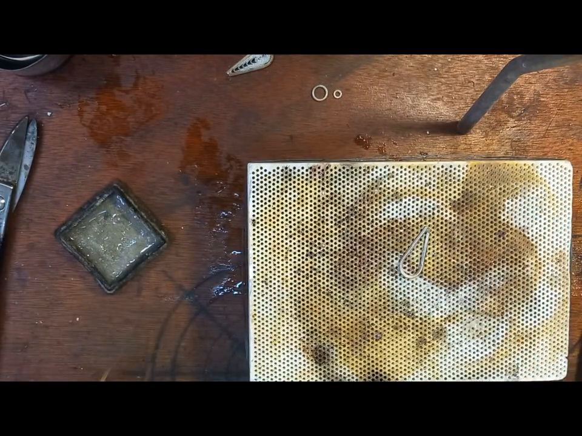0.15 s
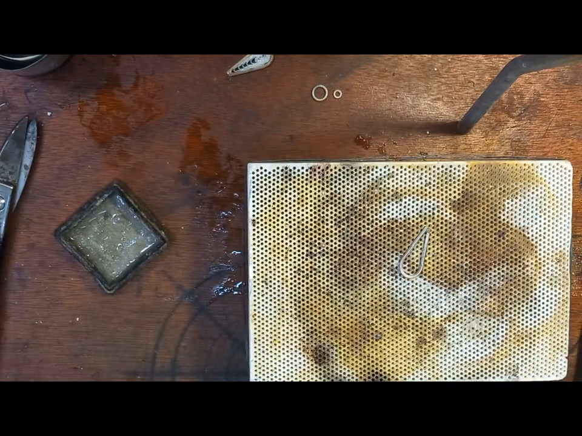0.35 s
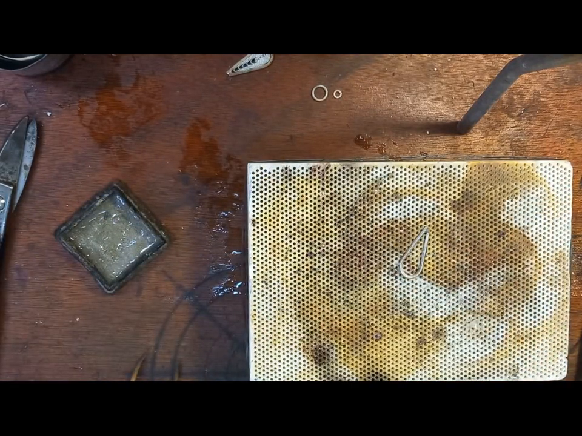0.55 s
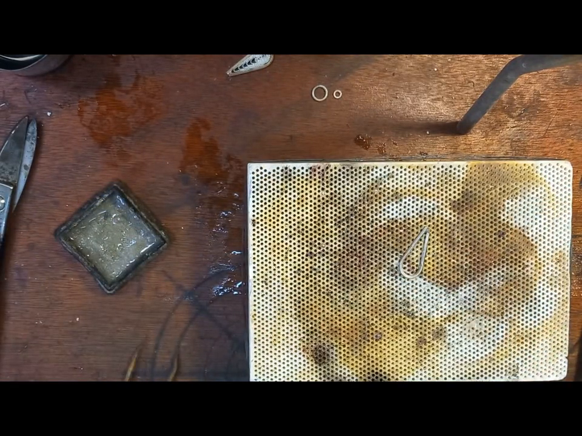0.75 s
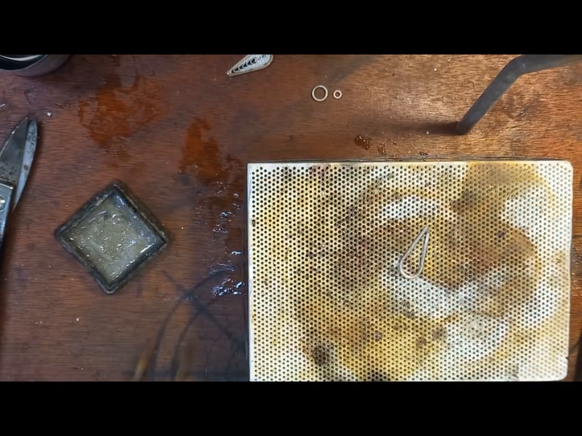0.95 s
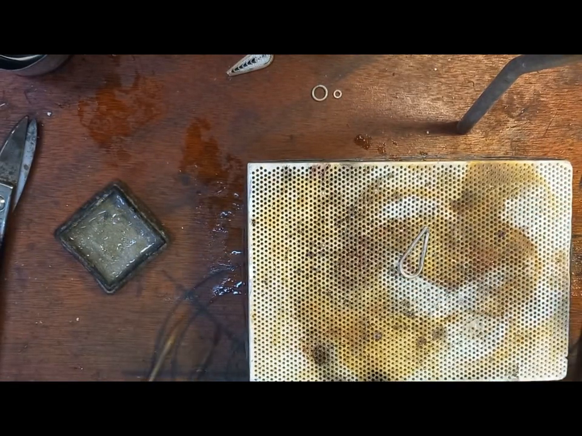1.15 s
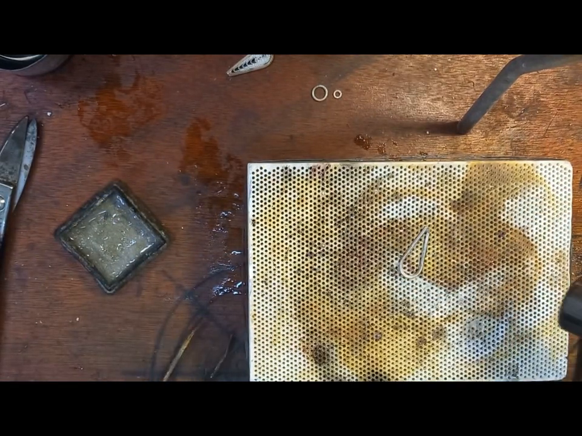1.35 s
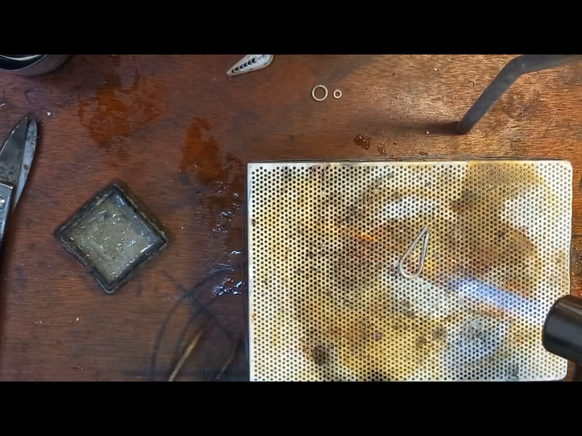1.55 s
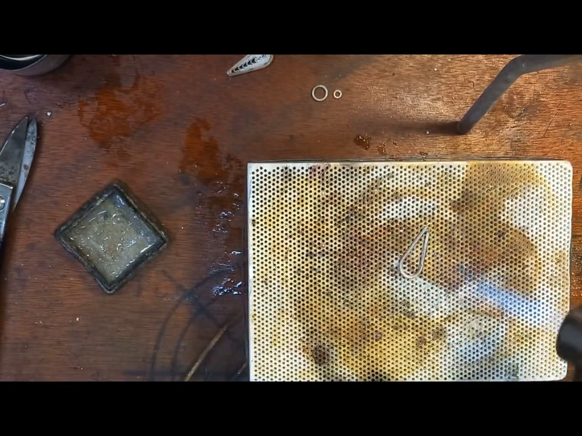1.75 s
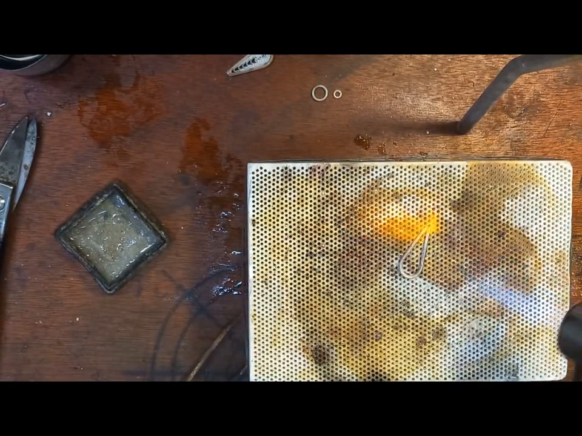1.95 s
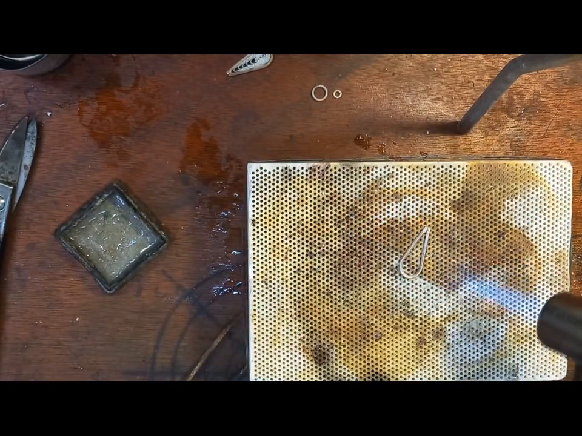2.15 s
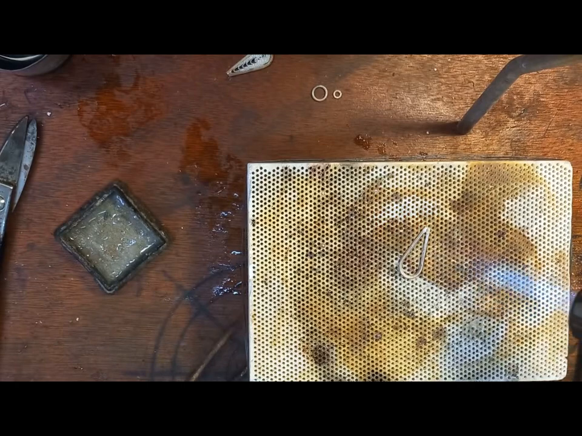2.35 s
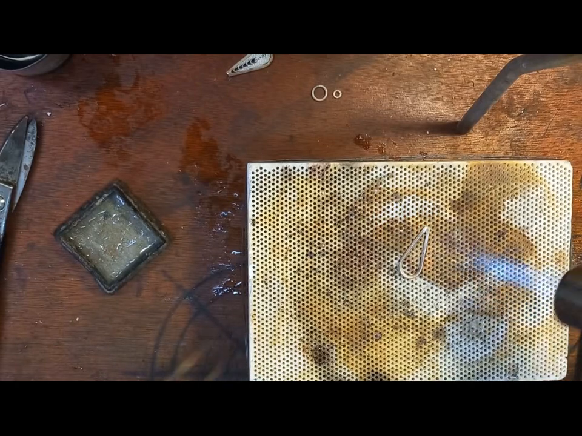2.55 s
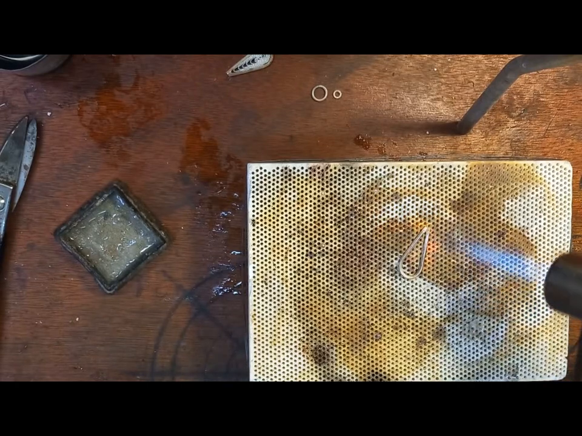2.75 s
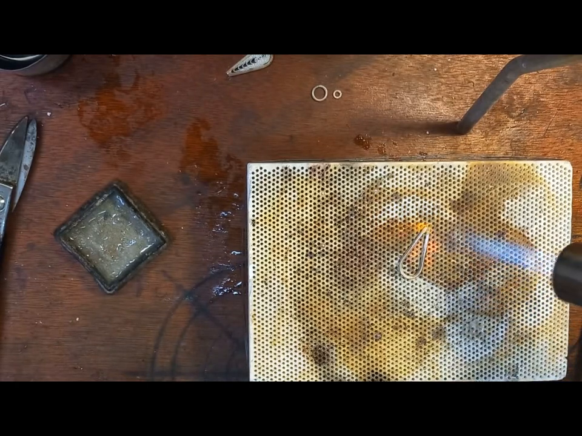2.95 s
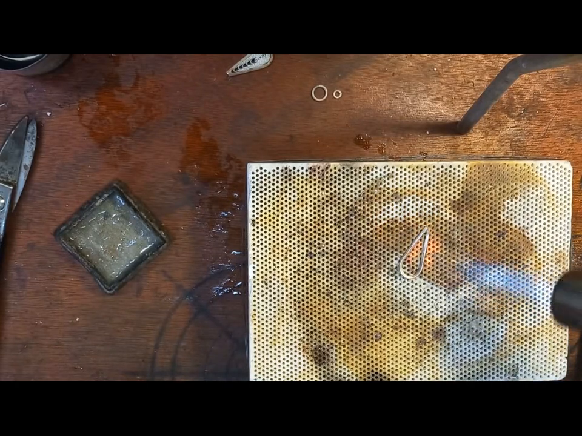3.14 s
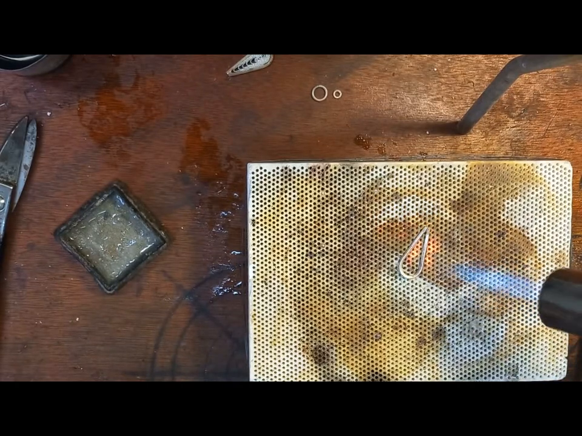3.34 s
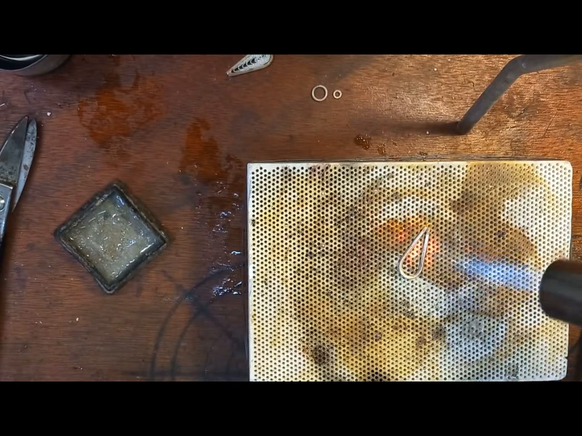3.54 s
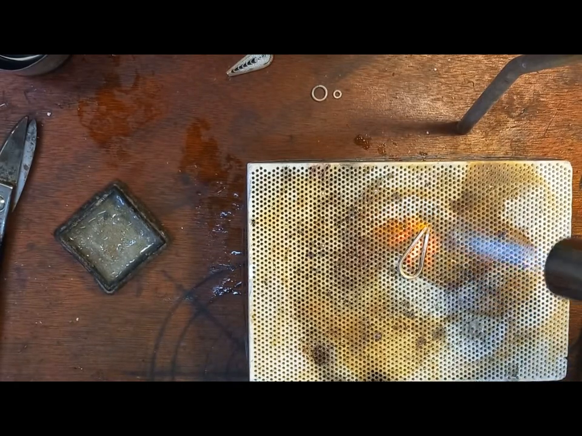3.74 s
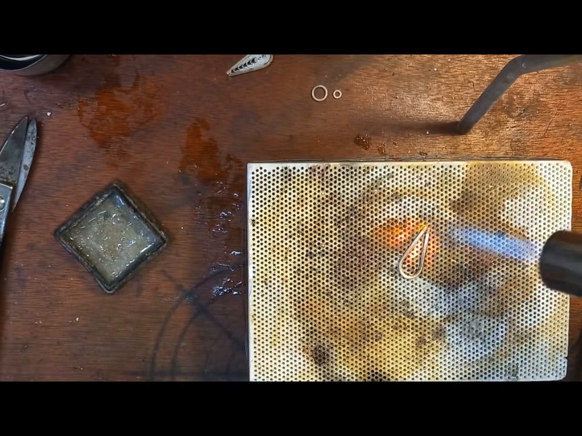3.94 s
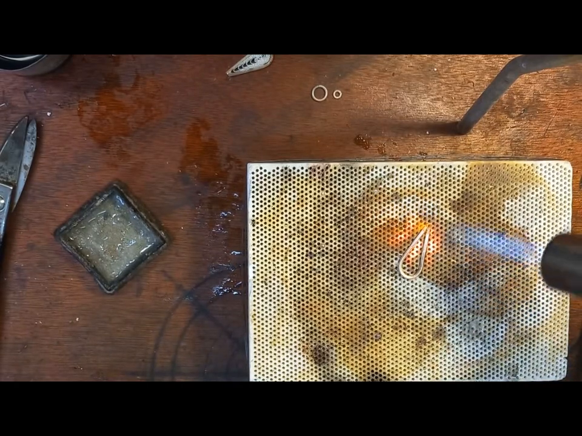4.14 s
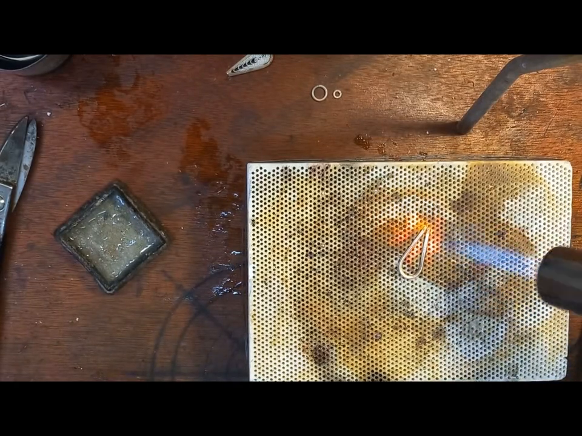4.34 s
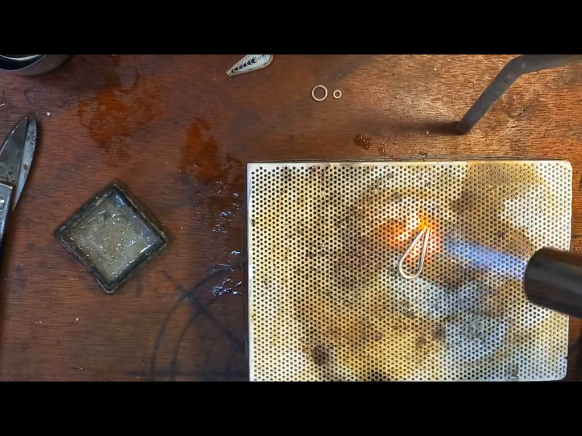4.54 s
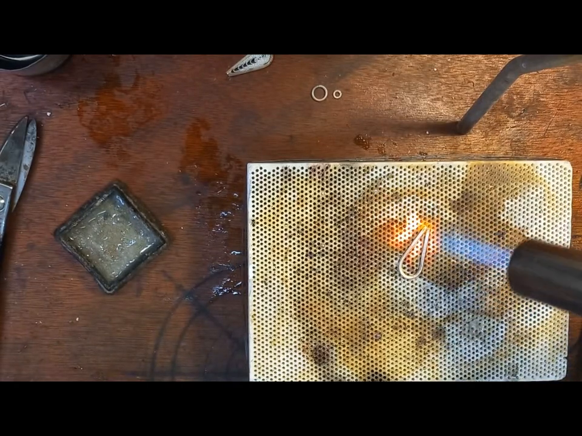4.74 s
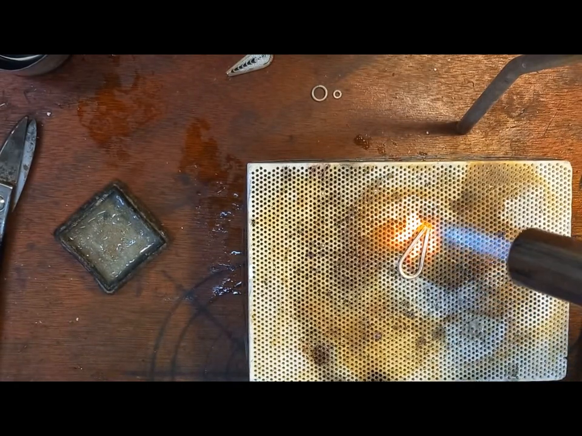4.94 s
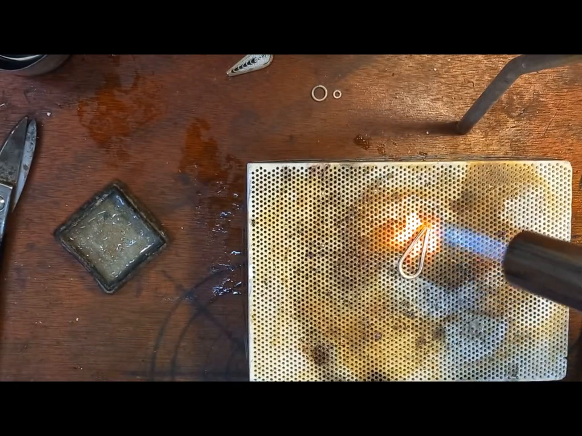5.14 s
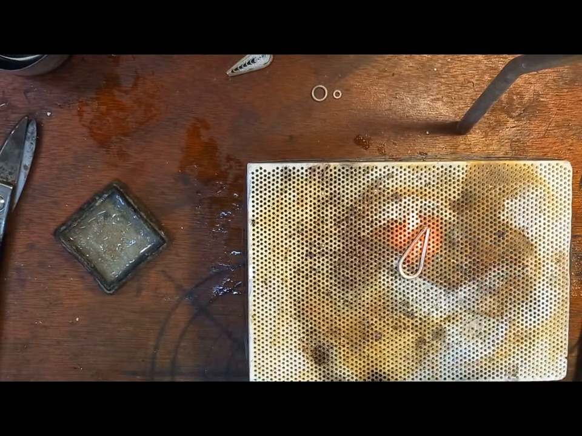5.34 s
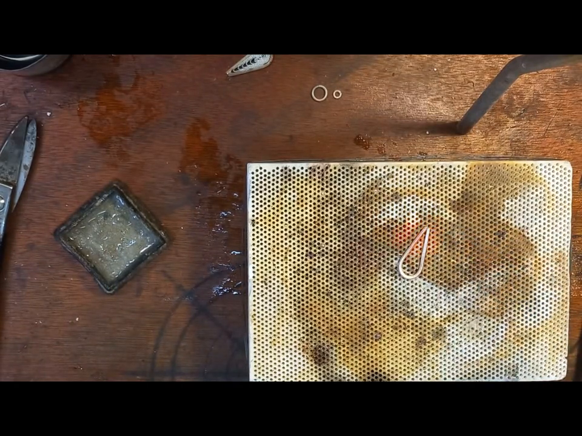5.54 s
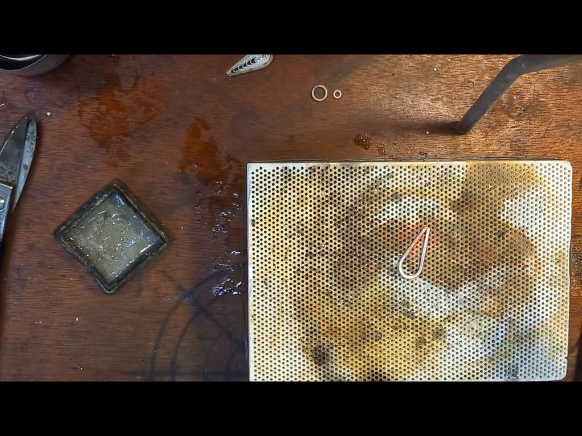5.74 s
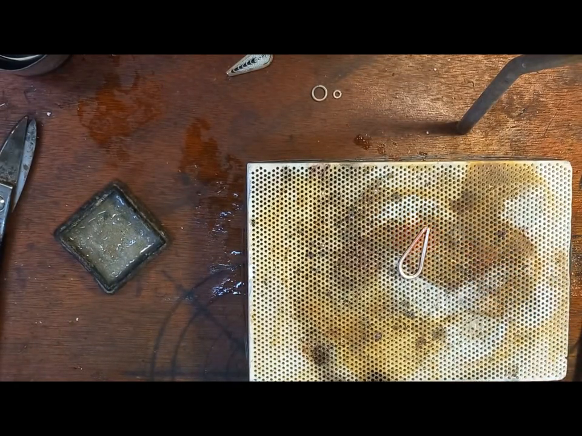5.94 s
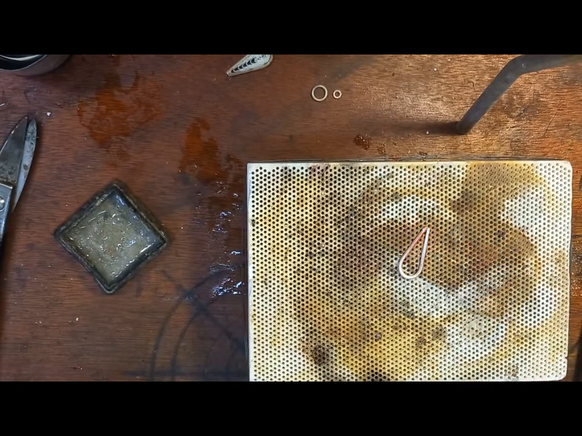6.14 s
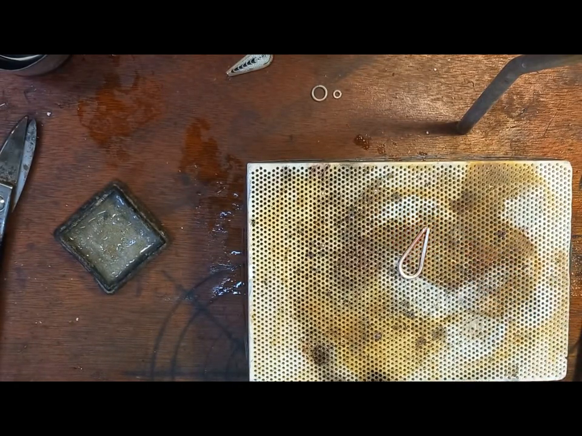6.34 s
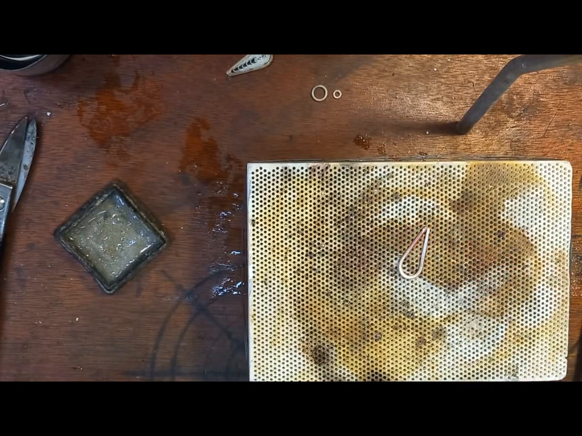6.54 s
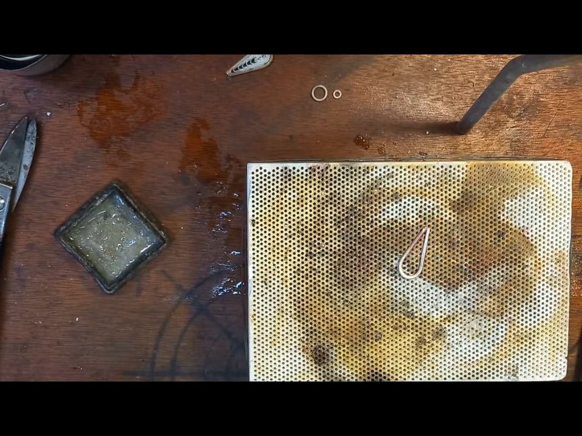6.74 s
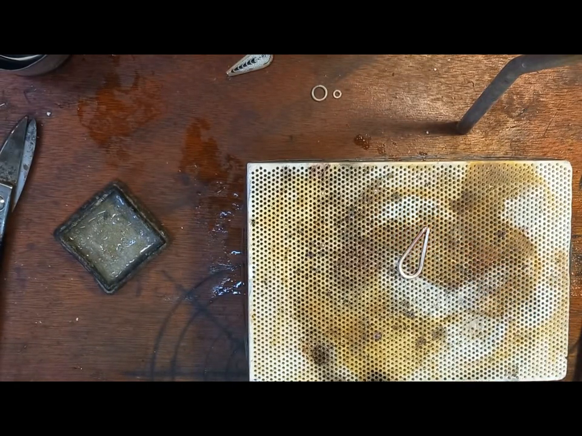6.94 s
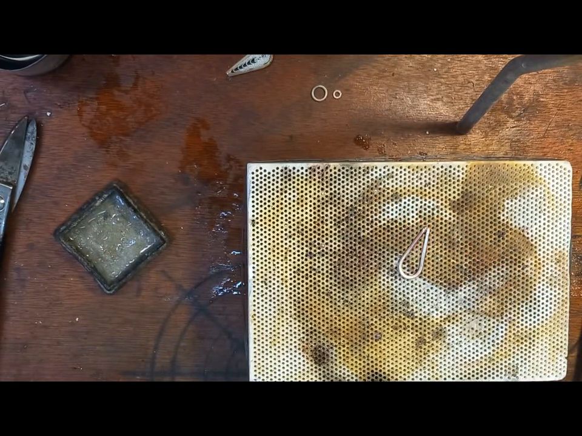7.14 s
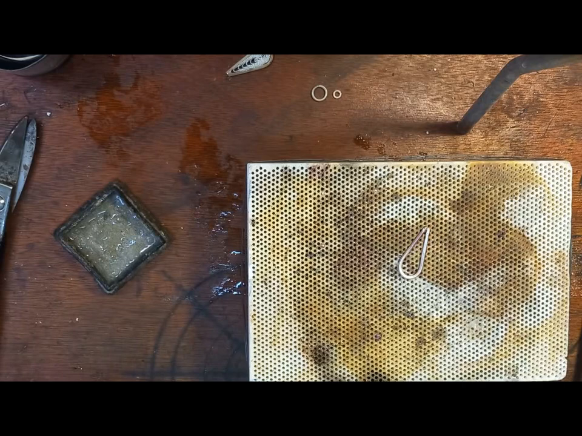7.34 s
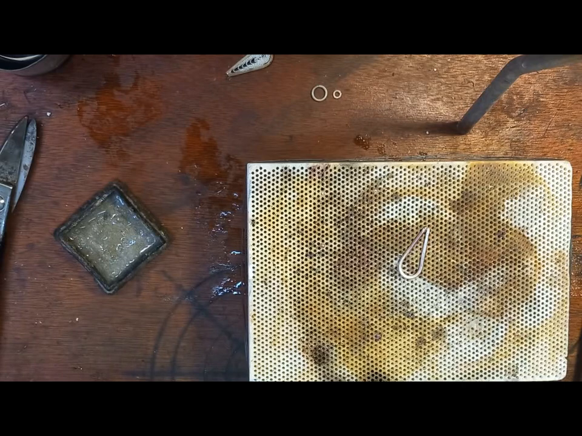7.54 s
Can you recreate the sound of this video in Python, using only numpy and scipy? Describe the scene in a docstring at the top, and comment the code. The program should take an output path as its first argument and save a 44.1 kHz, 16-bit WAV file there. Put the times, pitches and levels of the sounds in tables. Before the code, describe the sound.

In a small workshop with a low fan drone, a torch is picked up from a wooden bench with faint taps, slides and two hard knocks. Thin gas hisses briefly, an igniter snaps sharply, and the flame roars steadily, slightly stronger once aimed at metal. The valve clicks, the roar dies quickly, and only the hum and faint ticks remain. Close stereo microphone, short dry room.

```python
"""A gas torch at a wooden workbench, while a ventilation fan drones in the small workshop throughout.
First come a few taps, slides and two knocks (bench ringing under contact noise) as it is picked up.
Unlit gas then hisses (coloured noise), a spark snaps, and the flame roars (noise in resonances),
growing once it is aimed at a small metal piece. The valve shuts and the roar dies away.
Last come two very faint squeaks of cooling flux (gliding tones) and faint ticks and slides of handling."""
import sys
import numpy as np
from scipy import signal
from scipy.fft import rfft, irfft, next_fast_len
from scipy.io import wavfile
from scipy.ndimage import map_coordinates

SR = 44100
rng = np.random.default_rng(int(sys.argv[2]) if len(sys.argv) > 2 else 0)


def transcribe(u):
    """Save the signal u as a 16-bit wav file named by the first command-line argument.

    u: samples, shape (n,) or (channels, n), limited to [-1, 1]; the rate is SR.
    q: integer samples, one column per channel.
    """
    v = np.clip(np.atleast_2d(u).T, -1, 1)
    q = np.round(v * 32767).astype(np.int16)
    wavfile.write(sys.argv[1], SR, q)


N = 339035
TIME = np.arange(N) / SR  # s

GAS_ON, SPARK, GAS_OFF = 1.402, 1.5268, 5.228  # s
TOP_HZ = 15760  # nothing sounds from here up

# how alike left and right are in the flame and in low rubbing: f/Hz, likeness (1 = the same)
FLAME_ALIKE = [(200, 0.88), (700, .95), (1300, 0.63), (2200, 0.8), (3000, .95), (4500, 0)]
# how alike left and right are in the gas jet: f/Hz, likeness (1 = the same)
JET_ALIKE = [(2000, .8), (5000, 0.28), (8000, 0.51), (13000, 0.38)]
# how far the jet's left channel runs ahead of the right: f/Hz, phase/rad (negative = behind)
JET_PHASE = [(2000, -7), (2800, -2.5), (3400, -.5), (4100, -1.5), (4700, -1.5), (5300, -1.5), (6300, -3),
             (7100, -0.2), (8000, -2.5), (9400, -2), (10500, -2), (15500, -8)]
# left-right balance of the room and of handling: f/Hz, left minus right/dB
ROOM_SIDE = [(60, -2), (130, -2), (290, 2), (640, 0.5), (1410, 2.5), (3100, 1), (6820, -4), (15000, 5)]


def flame():
    """Turbulent burning roars in bench and room resonances, under the nozzle's hiss; aiming raises both."""
    # bench and room resonances that the roar excites: f/Hz, width/Hz (before resonant() narrows it), level/dB
    roar_modes = [(211, 25, 6.5), (301, 90, -10.5), (329, 25, 3.5), (390, 22.4, 5.5), (442, 22, 1.5),
                  (503, 30, 1.5), (572, 22, 4.5), (633, 31.5, 3), (716, 35, -12.5), (867, 21, -4),
                  (942, 16, -3), (1004, 34, -8), (1156, 44, -11.5), (1333, 22, -10), (1443, 46, -13),
                  (1570, 31, -9), (1815, 50, -10.5), (1940, 100, -12.5), (2287, 144, -14.5)]
    # smooth spectrum of the roar: f/Hz, relative level per Hz/dB
    roar_spectrum = [(120, -24), (170, -11), (250, -3), (420, -1.5), (640, -7.5), (760, -9.5), (1050, -3.5),
                     (1350, -13), (1900, -6.5), (2350, -10), (2700, -20.5), (5000, -44)]
    # spectrum of the nozzle's hiss: f/Hz, relative level per Hz/dB
    jet_spectrum = [(1500, -20), (2700, -1), (3050, 0.5), (3380, 3), (3750, 1), (4550, 0.5), (5100, -3),
                    (6400, -1.5), (7500, 0.5), (8450, 3.5), (8900, -11.5), (11500, -8.5), (12700, -2.5),
                    (13800, -8), (15800, -11.5)]
    # left-right balance of the flame: f/Hz, left minus right/dB
    flame_side = [(200, -3), (320, 1.5), (400, -5), (560, 2.5), (760, -9.5), (1000, 0), (1300, 0.5),
                  (1900, 2.5), (2400, 2), (3400, -0.5), (6500, -5.5), (8300, 5), (11000, 0.5), (15000, -1)]
    roar_db, jet_db = -25.4, -36.9  # the flame beside the piece, before the room answers
    aim_s, aim_takes_s = 2.65, .4  # the hand turns the flame onto the piece: when, and for how long
    aim_roar_db, aim_jet_db = 1.8, 1.1  # growth once the flame plays on the piece
    flutter_rate, flutter_roar_db, flutter_jet_db = 14, .45, .33  # eddies: knots per second, depths
    sway_rate, sway_db = 4, .35  # the roar swells as the hand wanders: knots per second, depth

    resonances = rush(resonant(roar_modes), FLAME_ALIKE, flame_side)
    smooth_roar = rush(colour(roar_spectrum), FLAME_ALIKE, flame_side)
    roar = unit(resonances + amp(-4.5) * smooth_roar)

    jet = lead(rush(colour(jet_spectrum), JET_ALIKE, flame_side), JET_PHASE)
    jet = bench_echo(jet, delay_ms=1.78, sway_ms=0.065, echo_db=-9)
    jet = bench_echo(jet, delay_ms=3.25, sway_ms=.08, echo_db=-17.5)
    jet = bench_echo(jet, delay_ms=5.3, sway_ms=0.072, echo_db=-15.5)

    aim = np.clip((TIME - aim_s) / aim_takes_s, 0, 1)
    flutter = wobble(flutter_rate)
    roar_level = roar_db + aim_roar_db * aim + flutter_roar_db * flutter
    roar_level += sway_db * wobble(sway_rate) + 0.62 * wobble(70)  # slow sway and fast flicker
    jet_level = jet_db + aim_jet_db * aim + flutter_jet_db * flutter
    roar = roar * amp(roar_level) * valve(SPARK, rise=0.011, fall_t60=0.15)
    jet = jet * amp(jet_level) * valve(SPARK, rise=.002, fall_t60=.18)
    return workshop(roar + jet, wet_db=-10.5, low_hz=1530)


def cold_gas():
    """Unlit gas whistles thinly through the burner tube, and dies away from the spark on."""
    # spectrum of the unlit gas: f/Hz, relative level per Hz/dB
    gas_spectrum = [(1500, -38), (2700, -14), (3550, -2.5), (4300, -12), (5400, -6), (6400, -.5), (7400, 3),
                    (8400, 1.5), (9200, -3.5), (10200, -15), (13000, -7), (15800, -20)]
    gas_side = [(3500, 5), (5000, -2), (7000, -9), (8400, 10), (11000, 0)]  # f/Hz, left minus right/dB
    gas = lead(rush(colour(gas_spectrum), JET_ALIKE, gas_side), JET_PHASE)
    unlit = amp(-60 * np.maximum(TIME - SPARK, 0) / .3)
    return amp(-36) * gas * valve(GAS_ON, rise=0.0093, fall_t60=.1) * unlit


def knocks():
    """Each knock is a short thud of contact noise and the ring of the wooden bench."""
    # knocks on the bench: t/s, level/dB, treble tilt/(dB per octave), favoured f/Hz
    blows = [(0.056, -41, -3, 900), (0.4035, -37, -2, 750), (.5645, -44, 3, 1200), (.5855, -42, -3, 1100),
             (.7645, -35.5, 0, 800), (.9445, -22, -2.5, 1100), (0.9475, -10.2, -.6, 2150),
             (1.2452, -16.5, -3, 640), (6.8345, -43, 1, 1900), (7.348, -41, -5, 600)]
    # ringing tones of the bench top: f/Hz, level/dB, time to fall 60 dB/s
    bench_modes = [(209, -14, .14), (301, -7, 0.21), (412, -6.5, 0.14), (456, -10, 0.15), (508, -10.5, .13),
                   (620, -3.5, 0.08), (760, -11, .15), (833, -18, .12), (940, -25, .1), (1098, -1.5, 0.05),
                   (1210, -4, 0.031), (1745, -10, 0.065), (2110, -4, .028)]
    # spectrum of the contact noise: f/Hz, relative level per Hz/dB
    thud_spectrum = [(100, -13), (300, -2), (480, .5), (750, 2), (1150, 3.5), (1500, -6.5), (1750, -2),
                     (2200, -3), (2900, -14.5), (4500, -19.5), (8000, -32), (9500, -50), (15000, -54)]
    thud_alike = [(300, .88), (640, 0.38), (1400, 0.0), (6000, 0)]  # f/Hz, likeness
    thud_side = [(200, -4), (400, 7), (2400, -0.5), (4400, -1)]  # f/Hz, left minus right/dB
    bench_phase = [(500, 0.35), (1300, 0.87), (2200, 0.71)]  # f/Hz, left ahead of right/rad

    out = np.zeros((2, N))
    contact = rush(colour(thud_spectrum), thud_alike, thud_side)
    for s, db, tilt_db, favoured_hz in blows:
        wood = lead(ring(bench_modes, s, scatter_db=2.5), bench_phase)
        wood = wood * amp([[.7], [-.7]])  # slightly louder on the left
        snap = amp(2.5) * burst(s, 0.015, 0.00015)
        body = amp(-9.5) * burst(s, 0.165, .003)
        blow = amp(-4.5) * wood + contact * (snap + body)
        # work on a short stretch around the knock only
        span = slice(max(round(s * SR) - 256, 0), round(s * SR) + SR // 2)
        out[:, span] += amp(db) * filtered(blow[:, span], blow_colour(tilt_db, favoured_hz))
    return workshop(out, wet_db=-11.5, low_hz=500)


def blow_colour(tilt_db, favoured_hz):
    """Gain of a blow: the tilt sets its brightness, and the spot struck favours one band."""
    favour_db, favour_octaves = 4, .5  # height and width of the favoured band

    def gain(hz):
        hz = np.clip(hz, 200, 6000)
        favour = favour_db * np.exp(-(np.log2(hz / favoured_hz) / favour_octaves) ** 2)
        return amp(tilt_db * np.log2(hz / 700) + favour)
    return gain


def ring(modes, s, scatter_db):
    """Tones that die away after a blow at time s, each at a slightly random strength."""
    t = np.arange(SR // 2) / SR
    tone = np.zeros(len(t))
    for k, (hz, db, t60) in enumerate(modes):
        level = db + scatter_db * rng.standard_normal() - 60 * t / t60
        tone += (-1) ** k * amp(level) * np.sin(2 * np.pi * hz * t)
    return np.pad(tone * (1 - np.exp(-t / 0.0002)), (round(s * SR), N))[:N]


def handling():
    """Igniter and valve snap, the torch body ticks, hands slide: short bursts of coloured noise."""
    # clicks of the torch, igniter and valve: t/s, level/dB, ring above click/dB, click's time to fall 60 dB/s
    clicks = [(.473, -56, -15, 0.017), (0.564, -39, -16, 0.015), (.584, -48, -12, 0.035),
              (SPARK, -8.5, -38, 0.009), (GAS_OFF, -22.5, -28, 0.03), (6.114, -49, -22, 0.05),
              (6.1678, -54, -20, 0.05), (6.432, -45, 0, 0.051), (6.835, -51, 16, 0.045),
              (6.842, -55, 9, 0.06), (7.2194, -53, -20, 0.045), (7.2887, -53.5, -22, .12),
              (7.4406, -49, -8, .05), (7.5322, -49, -1, 0.055)]
    # spectrum of a click: f/Hz, relative level per Hz/dB
    click_spectrum = [(500, -26), (1100, -1), (2600, -6), (3700, 6), (4400, 1), (5400, 2), (7500, 3.5),
                      (8400, -2.5), (9500, -11), (14000, -6.5), (16000, -20)]
    # resonances of the torch body: f/Hz, width/Hz (before resonant() narrows it), level/dB
    body_modes = [(1890, 200, 3), (2120, 320, -2)]
    # fingers and torch sliding: t/s, nominal length/s (it stops after 1.6 of these), scrape/dB, hollow rub/dB
    slides = [(0.403, 0.11, -64, -34.5), (0.425, 0.24, -57.5, -52), (.585, .07, -59, -43),
              (0.764, 0.14, -56, -33), (0.865, .06, -56, -60), (1.14, 0.18, -72, -45),
              (6.16, .13, -58, -70), (6.432, .07, -59, -65), (6.88, 0.15, -55, -53), (7.48, 0.13, -58, -48)]
    # spectrum of dry skin on wood: f/Hz, relative level per Hz/dB
    scrape_spectrum = [(500, -8), (2000, 1), (4000, 2), (7500, 2.5), (9500, -6), (14000, -4), (16000, -11)]
    # hollow scraping of the torch over the bench: f/Hz, width/Hz (before resonant() narrows it), level/dB
    hollow_modes = [(400, 170, -1), (617, 60, 2), (746, 96, 4), (1180, 290, -12), (1790, 200, -9.5),
                    (2560, 300, -22), (3650, 300, -20)]
    # soft thump of a hand on the bench: f/Hz, relative level per Hz/dB
    thump_spectrum = [(120, -27), (230, 3.5), (330, 2), (460, -9), (650, -33), (1500, -37), (4000, -66)]
    thump_s, thump_db = .585, -23

    crack = rush(colour(click_spectrum), [(1000, 0.43), (5000, .1)], [(1000, 0), (8000, -1)])
    clank = rush(resonant(body_modes), [(1000, .4)], ROOM_SIDE)
    scrape = rush(colour(scrape_spectrum), [(1000, .3)], ROOM_SIDE)
    rub = rush(resonant(hollow_modes), FLAME_ALIKE, ROOM_SIDE)
    thump = rush(colour(thump_spectrum), FLAME_ALIKE, ROOM_SIDE)

    out = amp(thump_db) * thump * burst(thump_s, t60=0.14, attack=.002)
    for s, db, ring_db, t60 in clicks:
        body_ring = amp(ring_db) * clank * burst(s, 0.094, 0.00038)
        out = out + amp(db) * (crack * burst(s, t60, .0002) + body_ring)
    grain = amp(3.2 * wobble(160))  # skin and wood catch unevenly
    for s, length, scrape_db, rub_db in slides:
        release = np.sqrt(np.clip(1 - (TIME - s) / (1.6 * length), 0, 1))
        stroke = burst(s, 3 * length, 0.006) * release  # quick start, slow release
        out = out + stroke * grain * (amp(scrape_db) * scrape + amp(rub_db) * rub)
    return workshop(out, wet_db=-4, low_hz=500)


def cooling():
    """Hot flux squeaks very faintly after the flame: tones whose pitch and level rise and fall together."""
    # thin squeaks of the cooling flux: t/s, length/s, level/dB
    squeaks = [(5.83, .15, -77), (6.01, .09, -78)]
    squeak_hz, arch_hz = 11900, 550  # pitch at the ends of a squeak, and its rise in the middle
    pitch = squeak_hz + 120 * wobble(300)  # trembles quickly
    level = np.zeros(N)
    for s, length, db in squeaks:
        arch = np.sin(np.pi * np.clip((TIME - s) / length, 0, 1))
        pitch = pitch + arch_hz * arch
        level = level + amp(db) * arch
    return level * np.sin(2 * np.pi * np.cumsum(pitch) / SR)


def fan():
    """A fan's unsteady low tones beat against each other over its rumble and the room's air noise."""
    # fan tones: f/Hz, level/dB (before drone level and balance), unsteadiness/Hz
    fan_tones = [(75.6, -39.5, 1.244), (84, -36, 2.93), (93.7, -47.5, 4.06), (114.3, -43.5, 2.565),
                 (131.8, -46, 3.54), (149, -52.5, 1.86), (190, -49.5, 1.98), (227.5, -47, 0.91),
                 (300, -57.5, 0.72), (443.7, -55, 2.99)]
    # spectrum of the room's air noise: f/Hz, relative level per Hz/dB
    air_spectrum = [(76, -22), (130, -9), (160, -6), (235, -5), (280, -11), (400, -14.5), (560, -12.5),
                    (750, -20), (1800, -25.5), (2800, -32.5), (7200, -40.5), (8300, -47), (9200, -58.5),
                    (14000, -56), (15800, -56)]
    # how alike left and right are in the room: f/Hz, likeness (negative = opposed)
    room_alike = [(60, 0.88), (180, 0.5), (550, 0.77), (1650, -0.29), (5000, -0.11), (15000, 0.23)]
    # fan rumble: f/Hz, relative level per Hz/dB
    rumble_spectrum = [(20, -46), (48, -32), (66, -9), (76, 4.5), (90, -3), (105, 6), (135, -11.5),
                       (170, -26), (300, -50), (1000, -92)]
    drone_db, swell_db, swell_rate = .4, .4, 1.5  # level, depth of slow swells, knots per second
    air_db, air_dip_db, air_rise_db_per_s = -42.5, 2.3, 1.1

    tones = np.zeros(N)
    for hz, db, drift in fan_tones:
        phase = 2 * np.pi * np.cumsum(hz + drift * wobble(9)) / SR
        tones += amp(db) * np.sqrt(2) * np.sin(phase) * amp(1.24 * wobble(6))
    rumble = rush(colour(rumble_spectrum), room_alike, ROOM_SIDE)
    drone = tones * amp([[-1.9], [-.2]]) + amp(-38) * rumble  # tones lean to the right
    drone = drone * amp(drone_db + swell_db * wobble(swell_rate))

    air = rush(colour(air_spectrum), room_alike, ROOM_SIDE)
    # the air noise sinks in the first second of the flame, then creeps up once the gas is shut off
    dip = air_dip_db * np.clip(TIME - SPARK, 0, 1)
    rise = air_rise_db_per_s * np.maximum(TIME - GAS_OFF, 0)
    return drone + amp(air_db - dip + rise + 0.16 * wobble(2.94)) * air


def workshop(x, wet_db, low_hz):
    """The room answers with a short tail of fading noise, mostly above low_hz, different left and right."""
    # how long the room rings: f/Hz, time to fall 60 dB/s
    room_t60 = [(200, 0.42), (1000, 0.18), (4000, 0.14), (12000, 0.068)]
    hz, t, z = signal.stft(rng.standard_normal((2, SR // 3)), SR, nperseg=256)
    fading = z * amp(-60 * t / along(room_t60, hz)[:, None])
    tail = signal.istft(fading, SR, nperseg=256)[1]
    tail = filtered(tail / np.linalg.norm(tail[0]), lambda f: f ** 2 / (f ** 2 + low_hz ** 2))
    tail = np.pad(tail, ((0, 0), (SR // 300, 0)))  # the answer comes 1/300 s late
    echo = signal.fftconvolve(x, tail, axes=1)[:, :N]
    return (x + amp(wet_db) * echo) / np.sqrt(1 + amp(2 * wet_db))


def bench_echo(x, delay_ms, sway_ms, echo_db):
    """The bench reflects the jet; as the hand sways, the delay drifts and the hiss changes colour."""
    sway = wobble(1.6) + .6 * np.array([wobble(3), wobble(3)])  # shared drift, plus one for each side
    delay = (delay_ms + sway_ms * sway) * SR / 1000  # in samples
    echo = np.array([map_coordinates(side, [np.arange(N) - d]) for side, d in zip(x, delay)])
    return unit(x + amp(echo_db) * echo)


def valve(start, rise, fall_t60):
    """Gate that opens at start and dies away once the gas is shut off."""
    opening = 1 - np.exp(-np.maximum(TIME - start, 0) / rise)
    return opening * amp(-60 * np.maximum(TIME - GAS_OFF, 0) / fall_t60)


def burst(s, t60, attack):
    """Envelope that starts at s and dies away, falling 60 dB in t60 seconds."""
    t = np.maximum(TIME - s, 0)
    return (1 - np.exp(-t / attack)) * amp(-60 * t / t60)


def rush(gain, alike, side):
    """Stereo noise of rms 1 with a given colour, left-right likeness and balance."""
    def mid_and_side(hz):
        turn = np.arccos(np.clip(along(alike, hz), -1, 1)) / 2
        return gain(hz) * np.array([np.cos(turn), np.sin(turn)])
    m, s = filtered(rng.standard_normal((2, N)), mid_and_side)
    stereo = np.array([m + s, m - s])
    return unit(filtered(stereo, lambda hz: amp(np.outer([.5, -.5], along(side, hz)))))


def lead(x, phase):
    """A sound reaches left and right at different phases: left runs ahead by the given angle."""
    return filtered(x, lambda hz: np.exp(1j * np.outer([.5, -.5], along(phase, hz))))


def resonant(modes):
    """Gain function of a set of resonances, each a peak narrowed to 0.78 of its listed width."""
    def gain(hz):
        power = sum(amp(2 * db) / (1 + ((hz - c) / (0.78 * w)) ** 2) ** 2 for c, w, db in modes)
        return np.sqrt(power)
    return gain


def colour(points):
    """Gain function of a spectrum given as f/Hz, level/dB."""
    return lambda hz: amp(along(points, hz))


def along(points, hz):
    """Reads values between listed frequencies on a log axis."""
    f, v = np.transpose(points)
    return np.interp(np.log(hz + 1), np.log(f + 1), v)


def filtered(x, response):
    """Shapes x by a response to each frequency."""
    n = x.shape[-1]
    m = next_fast_len(n + SR // 2)
    return irfft(rfft(x, m) * response(np.fft.rfftfreq(m, 1 / SR)), m)[..., :n]


def wobble(rate):
    """A smooth random curve through rate random knots a second."""
    return map_coordinates(rng.standard_normal(int(N * rate / SR) + 4), [TIME * rate])


def amp(db):
    """Decibels to gain."""
    return 10 ** (np.asarray(db) / 20)


def unit(x):
    """Scales to rms 1."""
    return x / np.sqrt(np.mean(x ** 2) + 1e-20)


def scene():
    """Everything on and around the bench."""
    return flame() + cold_gas() + knocks() + handling() + cooling() + fan()


def record(dry):
    """Keeps only what lies below TOP_HZ."""
    return filtered(dry, lambda hz: hz < TOP_HZ)


dry = scene()
out = record(dry)
transcribe(out)
```